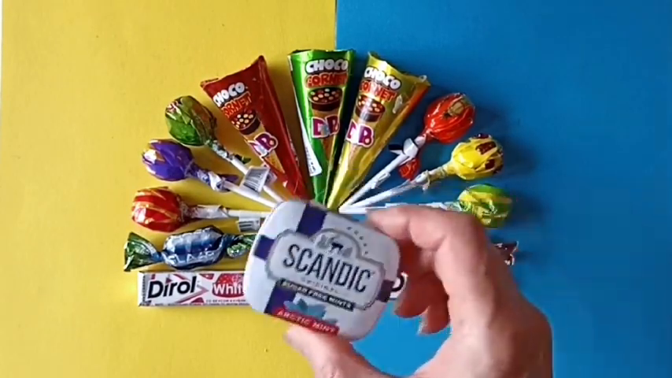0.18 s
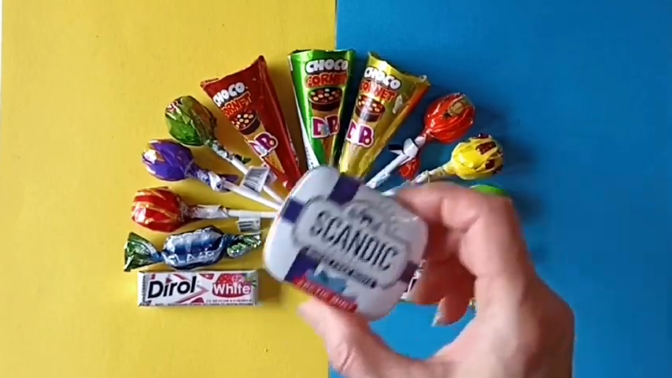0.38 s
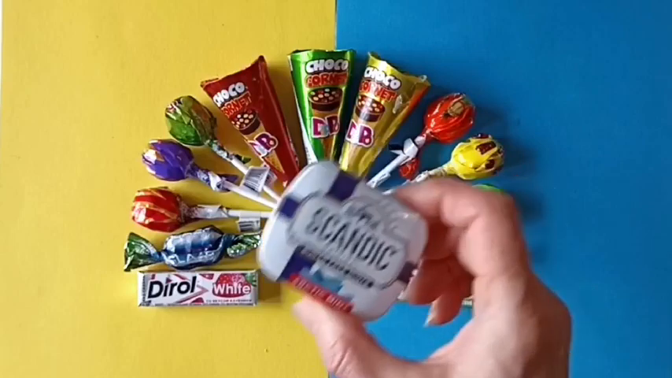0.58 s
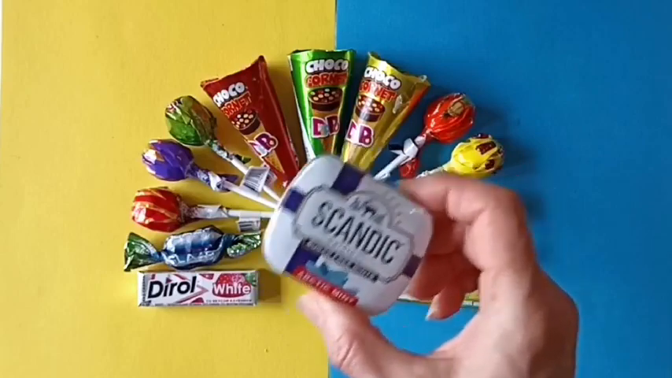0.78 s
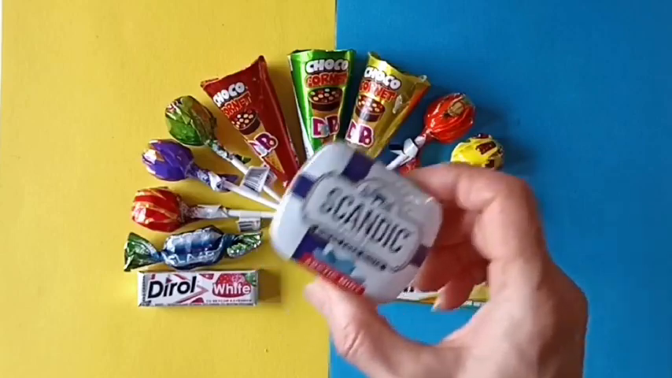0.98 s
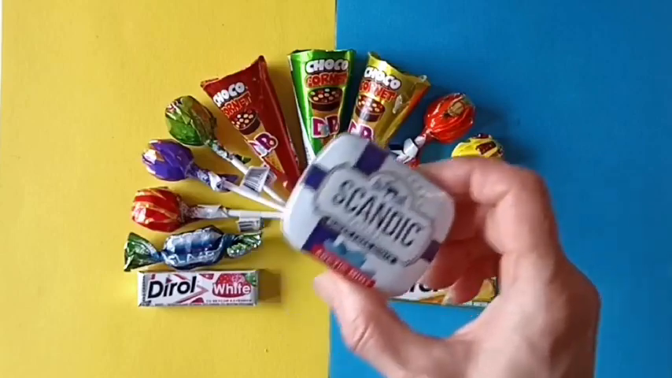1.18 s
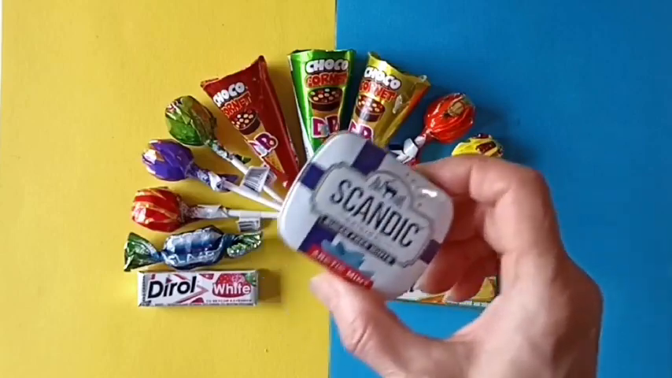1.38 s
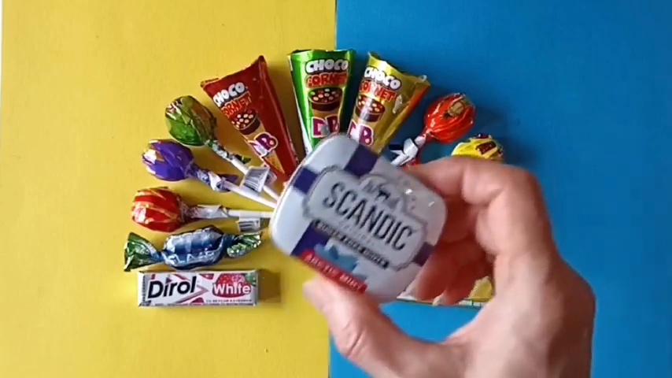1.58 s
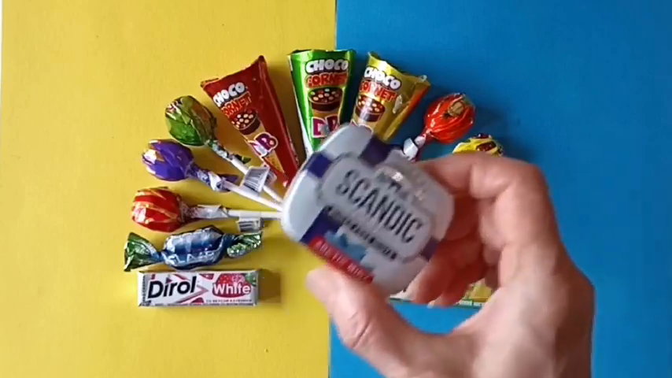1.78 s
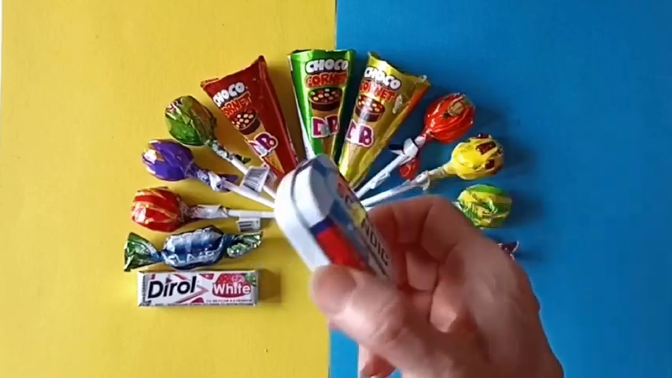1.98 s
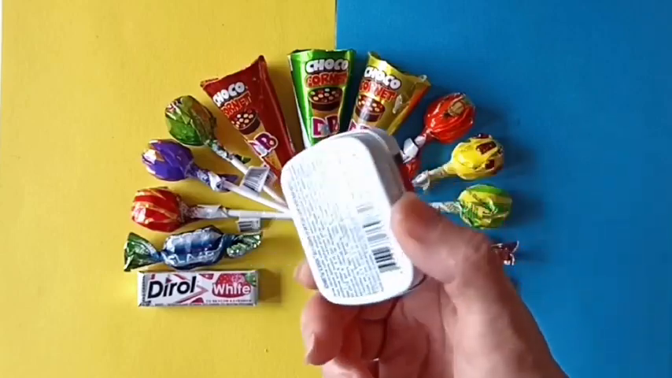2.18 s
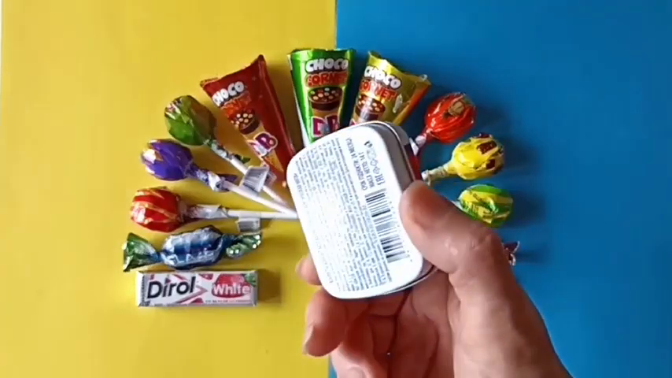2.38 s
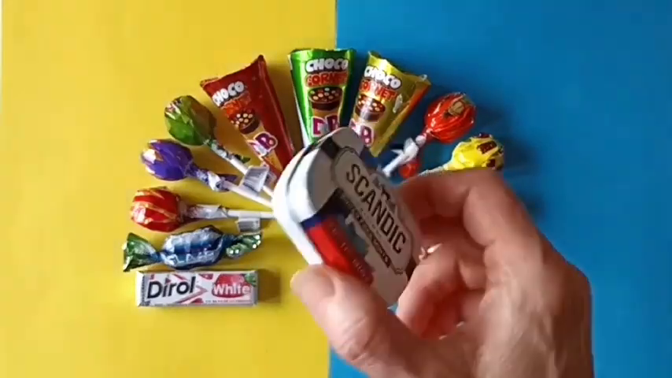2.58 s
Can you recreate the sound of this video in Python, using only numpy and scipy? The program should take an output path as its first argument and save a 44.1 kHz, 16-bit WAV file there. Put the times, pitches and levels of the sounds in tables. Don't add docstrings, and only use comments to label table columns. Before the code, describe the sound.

After faint finger rubbing and a few light ticks, a small tin of hard candies is shaken rapidly, bright and sharp, then tipped over twice with looser, softer clatter; close microphone, quiet indoor room, faint hum.

```python
import sys
import numpy as np
from scipy import signal
from scipy.fft import rfft, irfft
from scipy.io import wavfile
from scipy.ndimage import uniform_filter1d

SR = 44100
rng = np.random.default_rng(int(sys.argv[2]) if len(sys.argv) > 2 else 0)


def decibels_to_gain(level_db):
    exponent = np.asarray(level_db, float) / 20
    return 10 ** exponent


def file_out(sig):
    cols = np.atleast_2d(sig).T
    lim = np.clip(cols, -1, 1)
    pcm = np.round(lim * 32767).astype(np.int16)
    wavfile.write(sys.argv[1], SR, pcm)


N = 114660

# frequency in Hz, level in dB per Hz.
AIR_COLOUR = [(15, -84), (25, -37.5), (87, -8.5), (117, -6.5), (149, -13.5), (394, -12.5), (531, -16.5),
              (6000, -35.5), (16000, -44)]
# frequency in Hz, likeness from -1 to 1.
AIR_SAME = [(60, 0.58), (380, 0.31), (2380, -0.37), (15000, 0.022)]
HUM_DB = {2: -75, 3: -68, 4: -76, 5: -80, 7: -74, 8: -74}
# frequency in Hz, T60 in seconds.
ROOM_T60 = [(500, 0.54), (2000, 0.16), (6000, 0.2), (14000, 0.046)]
# frequency in Hz, width in Hz, level in dB.
SKIN = [(820, 310, 5), (2070, 200, 9.5), (3250, 900, 5.5)]

# time in seconds, peak in dB, low boom of the tin in
# dB re peak.
SLAMS = [(0.2518, -15, -19.5), (0.3403, -21.5, -2), (0.345, -10.5, -26), (0.4299, -19.5, -17),
         (0.4533, -11, -40), (0.466, -18.5, -10.5), (0.5601, -15, -23.5), (0.5845, -23.5, -14),
         (0.6551, -17.5, -19), (0.6625, -12, -31), (0.672, -15, -18.5), (0.7625, -15, -15.5),
         (0.7715, -13.5, -30), (0.7763, -15, -42), (0.8719, -14, -9), (0.8773, -12.5, -25),
         (0.9823, -15.5, -26), (1.078, -15.5, -9),
         (1.0851, -15.5, -13), (1.1981, -15, -10), (1.203, -10, -28), (1.2966, -13.5, -6.5),
              (1.3049, -12, -16), (1.417, -14, -7.5), (1.4223, -15.5, -29.5), (1.4313, -31.5, -18),
              (1.5131, -13, -9.5), (1.5189, -12, -9), (1.6162, -14, -12.5), (1.6245, -16.5, -11),
              (1.6337, -19.5, -11), (1.7038, -13.5, -5.5), (1.7109, -15.5, -25.5), (1.8078, -16.5, -12.5),
              (1.8209, -15.5, -21), (1.893, -13.5, -5), (1.901, -9, -15.5)]
# time in seconds, peak in dB.
STRAYS = [(0.036, -46.5), (.059, -32), (0.1048, -28), (0.1435, -33), (0.594, -44), (.832, -34),
          (0.8434, -28.5), (0.859, -27.5), (1.0277, -37), (1.19, -22.5), (1.27, -24), (1.2865, -30.5),
          (1.6812, -23), (1.6928, -26), (1.7297, -28.5), (1.8497, -31.5), (1.8737, -23.5), (1.882, -27)]
# time in seconds, peak in dB, boom in dB re peak.
TUMBLES = [(1.991, -46, 7), (2.0197, -37, -3.5), (2.0293, -41, -11), (2.0421, -24.5, -14),
           (2.0585, -27, -3), (2.0827, -29.5, -11), (2.0975, -31, -10), (2.2114, -19.5, -14),
           (2.228, -18, -5), (2.2524, -24.5, -22.5), (2.2645, -38.5, 0.5), (2.2815, -23.5, -16),
           (2.2923, -17, -20), (2.3298, -24, -21), (2.3918, -43, -20)]
# time in seconds, peak in dB, boom in
# dB re peak.
LANDINGS = [
    (0.2445, -19, -31.5),
    (2.2757, -16, -35),
            (0.053, -41, -24), (0.17, -53, -19), (0.2246, -36.5, -10), (0.2357, -30, -12), (0.257, -20, -18),
           (0.3511, -17.5, -17), (0.445, -20, -12), (0.4585, -27, -23), (0.579, -19, -12),
           (0.6689, -16, -31), (0.6925, -29, -13), (.7817, -17.5, -8), (0.8053, -34, -15),
           (.8851, -19.5, -7), (0.9898, -15.5, -7), (1.0666, -27, -17), (1.0968, -16, -12),
           (1.1165, -31.5, -11), (1.2066, -24.5, -19.5), (1.279, -24, -10.5), (1.314, -28.5, -7),
           (1.328, -31, -14.5), (1.4128, -15.5, -10.5), (1.4468, -30, -5), (1.5031, -36.5, -19.5),
           (1.5271, -22, -12), (1.648, -34, -13.5), (1.8251, -20.5, -16.5), (1.8326, -31, -17.5),
           (1.9138, -23, -14.5), (2.0334, -34, -16), (2.2586, -31, -15.5), (2.3435, -36, -15)]
# start in seconds, length in seconds, level in dB, boom in dB re level.
HEAPS = [(0.241, 0.025, -25, -15), (0.333, 0.024, -25, -18), (0.437, 0.031, -24.5, -13.5),
         (0.567, 0.018, -21.5, -15.5), (0.655, 0.021, -33.5, -0.5), (0.773, 0.014, -26.5, -8.5),
         (0.866, 0.015, -25.5, -10), (0.982, 0.018, -27.5, -3.5), (1.07, 0.02, -25, -6.5),
         (1.203, 0.013, -25, -8.5), (1.301, 0.013, -36, -1.5), (1.401, 0.032, -29.5, -11),
         (1.5, 0.015, -27.5, -12.5), (1.619, 0.022, -27, -10), (1.706, 0.011, -24, -9),
         (1.81, 0.019, -30, -3), (1.903, 0.014, -24.5, -13), (2.022, 0.072, -37.5, -10.5),
         (2.223, 0.034, -46.5, -10.5), (2.276, 0.028, -23.5, -14.5), (2.305, 0.032, -29.5, -29)]
# clack band in dB, sparkle band in dB.
FACES = [(-0.5, -3), (-1, 3.5), (2, 0), (0.5, -1), (-0.5, -0.5), (-2, 0.5), (0.5, 0), (0.5, 1.5),
         (2.5, -0.5), (-1, -1), (2.5, 3), (1.5, 1), (2.5, 3), (-2.5, 0.5), (1.5, 1), (1, 1.5), (-0.5, 0.5),
         (-3, -3), (2, -1.5), (-2.5, -0.5), (-2.5, -4.5)]
# time in seconds, level in dB.
SLIDE = [(0, -57), (.19, -56.5), (.24, -39.5), (.4, -40.5), (.53, -43), (.63, -36.5), (.73, -41.5),
         (.84, -37.5), (.94, -41.5), (1.15, -44), (1.26, -38.5), (1.37, -44.5), (1.48, -42), (1.77, -42.5),
         (1.92, -39), (2.0, -51), (2.12, -60.5), (2.2, -72.5)]

# frequency in Hz, level in dB, T60 in seconds.
TIN_MODES = [(1020, -3, .05), (1250, -2, .04), (1610, -4, .05), (1940, -1, .05), (2480, -3, .04),
             (2790, -2, .04), (3280, -5, .05), (3930, -4, .05), (4200, -5, .04), (7450, -8, .05),
             (11000, -7, .04), (11800, -5, .025), (12500, -1, .03), (13050, -3, .025)]
# frequency in Hz, level in dB, T60 in seconds.
LID_MODES = [(2105, 0, .13), (2128, -11, .3), (2195, -7, .16), (1975, -14, .1), (5600, -11, .08),
             (5680, -4, .055), (5770, -7, .05)]
# time in seconds, level in dB.
LID_FREEDOM = [
    (.3, -15),
    (2.0, -15),
    (2.21, 2),
    (2.27, -1),
]
# frequency in Hz, likeness from 0 to 1.
TIN_SAME = [(1200, 1), (2500, 0.93), (5000, 0), (14000, 0.27)]
# frequency in Hz, level in dB.
SHELL = [(2300, -0.5), (2800, 1.5), (3300, 0.5), (3900, 1), (4600, 3), (5200, -0.5), (6200, 2),
         (10000, 0.5)]
# frequency in Hz, level in dB.
LEFT_PORT = [(600, -15), (1050, -2.5), (4800, -5.5), (7500, -11.5), (11300, -2.5), (11900, 5.5),
             (13300, 3.5), (15300, -3.5)]
RIGHT_PORT = [(600, -15), (1050, -4), (3900, -3), (5300, -5), (8800, -4), (11300, -10.5), (12400, -9),
              (15300, -14.5)]

AIR_DB, HUM_HZ, HUM_WANDER_DB = -63.5, 49.2, 2
ROOM_DB, ROOM_GAP_S = -10.5, 0.0027
GRIP_DB, GRIP_END_S, GRIP_FADE_S = -55, 0.14, 0.17
HEAP_RISE_S, HEAP_FALL_DB_PER_S = 0.0022, 526
HEAP_PER_S, HEAP_SPREAD_DB = 2600, 1.6
SLIDE_PER_S, SLIDE_SPREAD_DB, SLIDE_BOOM_DB = 3500, 2.5, -8.5
STRAY_BOOM_DB = -18.5
BOUNCE_S, BOUNCE_DB, CONTACT_S = 0.001, -3, 0.0002
MODE_SPREAD_DB, BOOM_SPLIT_HZ = 7.0, 1700
DENSE_DB, DENSE_T60 = -2, 0.024
THUD_HZ, THUD_T60, THUD_DB = 612, 0.035, -17
KNOCK_HZ, KNOCK_T60, KNOCK_DB = 2330, 0.0045, -10.5
TIN_DB, LEFT_LEAD_S = 1, 0.00007
CLACK_HZ, SPARKLE_HZ, TURN_LEAD_S = (1800, 3100), 10000, 0.015
DIP_HZ, DIP_Q, DIP_SHARE = 2270, 14, 0.75
BEND, EDGE_HZ = 0.034, 15450


def evened(x):
    return x / np.sqrt(np.mean(x ** 2) + 1e-20)


def read(points, hz):
    f, value = np.transpose(points)
    return np.interp(np.log(hz + 1), np.log(f + 1), value)


def over_time(points):
    return np.interp(np.arange(N) / SR, *np.transpose(points))


def causal(points):
    log_gain = np.log(decibels_to_gain(read(points, abs(np.fft.fftfreq(4096, 1 / SR)))))
    return np.fft.ifft(np.exp(np.conj(signal.hilbert(log_gain)))).real[:1024]


def ringing(t, t60):
    return decibels_to_gain(-60 * t / t60)


def shower(per_s, spread_db):
    struck = rng.random(N) < per_s / SR
    size = np.minimum(rng.exponential(1, N), 4)
    return evened(struck * decibels_to_gain(spread_db * size))


def hum():
    t, total = np.arange(N) / SR, np.zeros((2, N))
    for k, db in HUM_DB.items():
        wander = evened(uniform_filter1d(rng.standard_normal((2, N)), 6000))
        cycles = k * HUM_HZ * t + rng.random() + 0.19 * rng.random((2, 1))
        total += decibels_to_gain(db + HUM_WANDER_DB * wander) * np.sqrt(2) * np.sin(2 * np.pi * cycles)
    return total


def air():
    hz = np.fft.rfftfreq(N, 1 / SR)
    a, b = rfft(rng.standard_normal((2, N)))
    same = np.clip(read(AIR_SAME, hz), -1, 1)
    sides = np.array([a, same * a + np.sqrt(1 - same ** 2) * b])
    return decibels_to_gain(AIR_DB) * evened(irfft(sides * decibels_to_gain(read(AIR_COLOUR, hz)), N))


def room(x):
    taps = np.zeros((2, SR // 2))
    slots = np.arange(round(ROOM_GAP_S * SR), SR // 2 - 20, 20)
    at = slots + rng.integers(0, 20, (2, len(slots)))
    np.put_along_axis(taps, at, rng.choice([-1., 1.], at.shape), 1)
    hz, t, bands = signal.stft(taps, SR, nperseg=128)
    tail = signal.istft(bands * ringing(t, read(ROOM_T60, hz)[:, None]), SR, nperseg=128)[1]
    return signal.fftconvolve(x, tail / np.linalg.norm(tail[0]), axes=1)[:, :N]


def grip():
    hz, t = np.fft.rfftfreq(N, 1 / SR), np.arange(N) / SR
    colour = sum(decibels_to_gain(db) / (1 + (2 * (hz - f) / width) ** 2) for f, width, db in SKIN)
    crackle = shower(3000, 2.1) * rng.standard_normal(N)
    rub = crackle + 0.5 * rng.standard_normal((2, N))
    fade = np.clip(1 + (GRIP_END_S - t) / GRIP_FADE_S, 0, 1)
    return decibels_to_gain(GRIP_DB) * evened(irfft(rfft(rub) * colour, N)) * fade


def heaps():
    t, power = np.arange(N) / SR, np.zeros((2, N))
    for start, length, db, boom_db in HEAPS:
        rise = np.clip((t - start) / HEAP_RISE_S, 0, 1)
        shape = rise * decibels_to_gain(db - HEAP_FALL_DB_PER_S * np.maximum(t - start - length, 0))
        power += shape ** 2 * decibels_to_gain([[0], [2 * boom_db]])
    return np.sqrt(power) * shower(HEAP_PER_S, HEAP_SPREAD_DB)


def sliding():
    level = decibels_to_gain(over_time(SLIDE)) * decibels_to_gain([[0], [SLIDE_BOOM_DB]])
    return level * shower(SLIDE_PER_S, SLIDE_SPREAD_DB)


def single_hits():
    force = np.zeros((2, N))
    strays = [(*row, STRAY_BOOM_DB) for row in STRAYS]
    hits = np.array(SLAMS + strays + TUMBLES + LANDINGS)
    at, peak_db, boom_db = hits.T
    size = decibels_to_gain([peak_db, peak_db + boom_db]) * np.sqrt(0.0013 * SR)
    force[:, np.round(at * SR).astype(int)] += size
    lags = np.cumsum(rng.uniform(0.54, 1.6, (len(hits), 2)), 1) * BOUNCE_S
    for k, lag in enumerate(lags.T):
        force[:, np.round((at + lag) * SR).astype(int)] += size * decibels_to_gain(BOUNCE_DB * (k + 1.5))
    return force


def tap(count=90):
    t = np.arange(2200) / SR
    hz, db, t60 = np.transpose(TIN_MODES)
    detune = np.minimum(60 / hz, 0.04) * rng.uniform(-0.93, 1, len(hz))
    dense_hz = rng.uniform(850, 16000, count)
    dense_t60 = DENSE_T60 * rng.uniform(0.5, 1.5, count) * (4000 / dense_hz) ** 0.15
    hz = np.append(hz * (1 + detune), dense_hz)
    db = np.append(db, np.full(count, DENSE_DB)) + MODE_SPREAD_DB * rng.standard_normal(len(hz))
    t60 = np.append(t60, dense_t60)

    onset, after = np.minimum(t / CONTACT_S, 1)[:, None], t[:, None]
    tones = np.sin(2 * np.pi * (hz * after + rng.random(len(hz))))
    modes = onset * decibels_to_gain(db) * ringing(after, t60) * tones
    high = hz >= BOOM_SPLIT_HZ
    parts = np.array([modes[:, high].sum(1), modes[:, ~high].sum(1)])
    parts /= np.linalg.norm(parts, axis=1, keepdims=True)

    thud = ringing(t, THUD_T60) * np.sin(2 * np.pi * THUD_HZ * rng.uniform(0.7, 1.3) * t)
    knock = ringing(t, KNOCK_T60) * np.sin(2 * np.pi * KNOCK_HZ * rng.uniform(0.84, 1.213) * t)
    parts[0] += decibels_to_gain(THUD_DB) * thud / np.linalg.norm(thud)
    parts[0] += decibels_to_gain(KNOCK_DB) * knock / np.linalg.norm(knock)
    return parts


def lid_ring(tick):
    t = np.arange(SR // 4) / SR
    ring = sum(decibels_to_gain(db) * ringing(t, t60) * np.sin(2 * np.pi * hz * t) for hz, db, t60 in LID_MODES)
    coupling = rng.uniform(0.6, 1.4, N) * rng.choice([-1., 1.], N)
    drive = tick * coupling * decibels_to_gain(over_time(LID_FREEDOM))
    return signal.oaconvolve(drive, ring / np.linalg.norm(ring))[:N]


def tin(spots=16):
    force = heaps() + sliding() + single_hits()
    spot, views = rng.integers(0, spots, N), np.zeros((2, N))
    for k in range(spots):
        for view in range(2):
            views[view] += signal.oaconvolve(force * (spot == k), tap(), axes=1)[:, :N].sum(0)
    lid = lid_ring(force[0])
    hz = np.fft.rfftfreq(N, 1 / SR)
    same = np.clip(read(TIN_SAME, hz), 0, 1)
    a, b = rfft(views)
    right = same * a + np.sqrt(1 - same ** 2) * b + rfft(lid)
    right *= np.exp(-2j * np.pi * hz * LEFT_LEAD_S)
    return decibels_to_gain(TIN_DB) * np.array([views[0] + lid, irfft(right, N)])


def turned(x):
    starts = np.array(HEAPS)[:, 0] - TURN_LEAD_S
    which = np.maximum(np.searchsorted(starts, np.arange(N) / SR) - 1, 0)
    clack, sparkle = uniform_filter1d(decibels_to_gain(FACES)[which], size=200, axis=0).T
    mid = signal.filtfilt(*signal.butter(1, CLACK_HZ, "band", fs=SR), x)
    top = signal.filtfilt(*signal.butter(1, SPARKLE_HZ, "high", fs=SR), x)
    return x + (clack - 1) * mid + (sparkle - 1) * top


def scene():
    near = signal.lfilter(*signal.butter(2, 250, "high", fs=SR), turned(tin()))
    near = near - DIP_SHARE * signal.lfilter(*signal.iirpeak(DIP_HZ, DIP_Q, SR), near)
    heard = near + decibels_to_gain(ROOM_DB) * room(near)
    ports = np.array([np.convolve(causal(port), causal(SHELL)) for port in (LEFT_PORT, RIGHT_PORT)])
    return signal.oaconvolve(heard, ports, axes=1)[:, :N] + grip() + air() + hum()


def band_limit(x):
    return signal.sosfilt(signal.butter(12, 16460, fs=SR, output="sos"), x)


def record(dry):
    lows = signal.lfilter(*signal.butter(2, 200, fs=SR), dry ** 2)
    edge = signal.firwin(numtaps=161, cutoff=EDGE_HZ, window="blackman", fs=SR)
    mix = signal.oaconvolve(dry + BEND * lows, edge[None], "same", axes=1)
    return band_limit(mix)


dry = scene()
out = record(dry)
file_out(out)
```